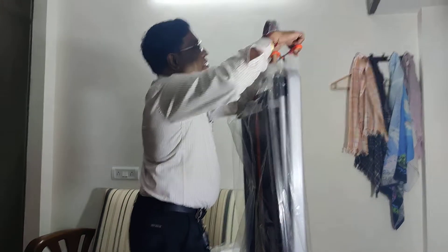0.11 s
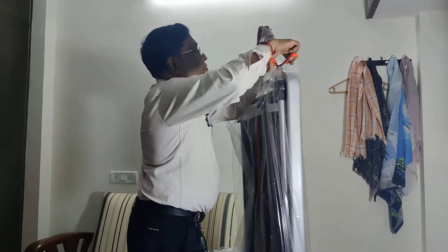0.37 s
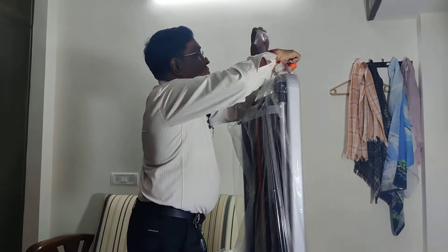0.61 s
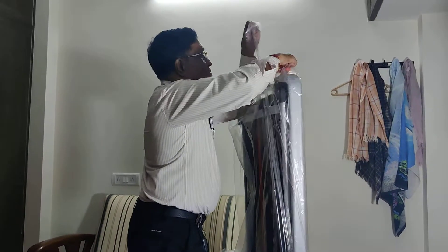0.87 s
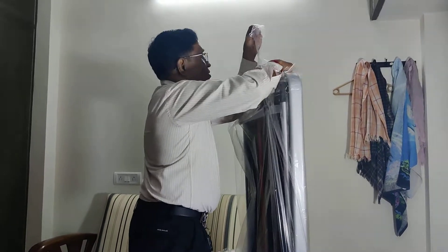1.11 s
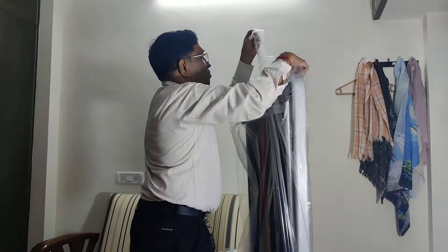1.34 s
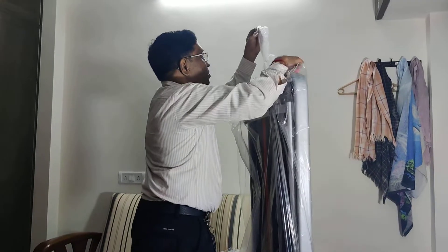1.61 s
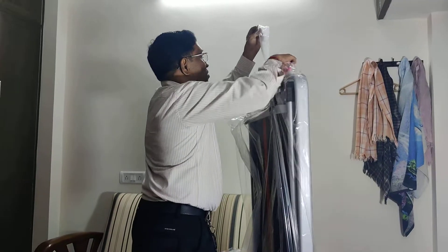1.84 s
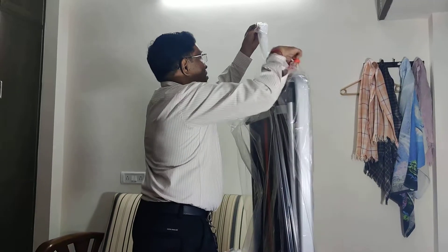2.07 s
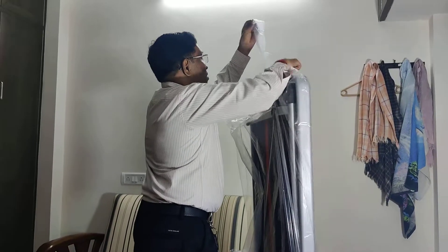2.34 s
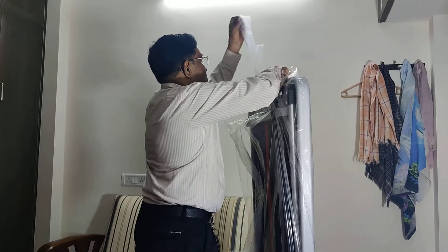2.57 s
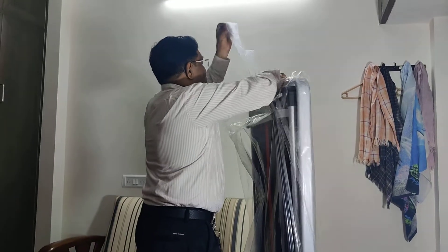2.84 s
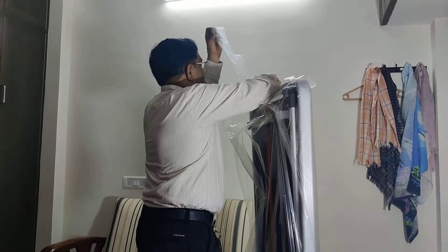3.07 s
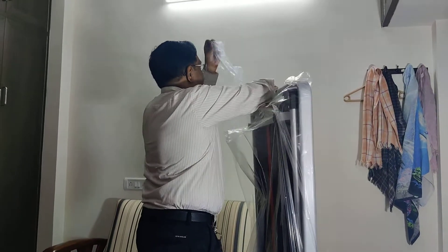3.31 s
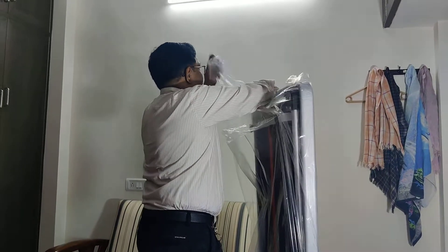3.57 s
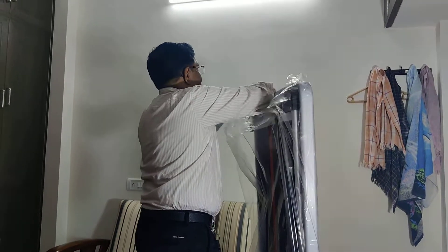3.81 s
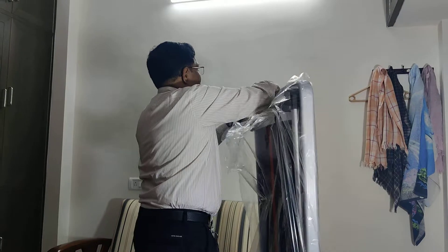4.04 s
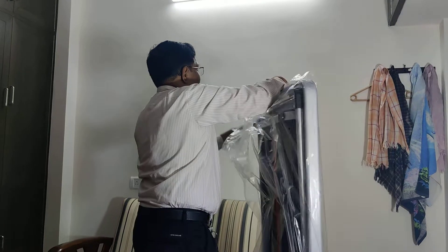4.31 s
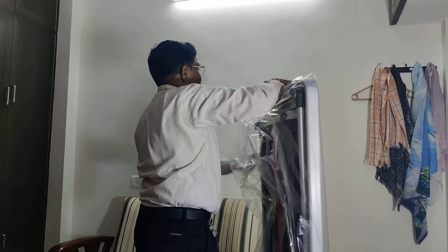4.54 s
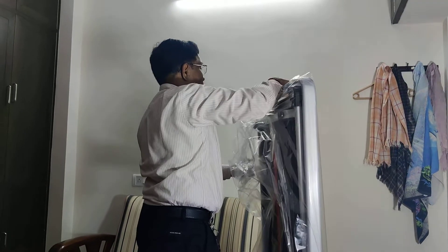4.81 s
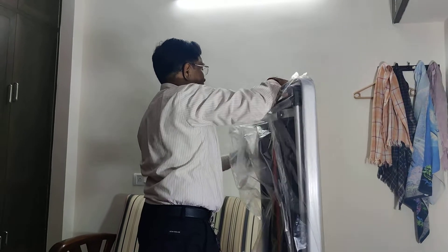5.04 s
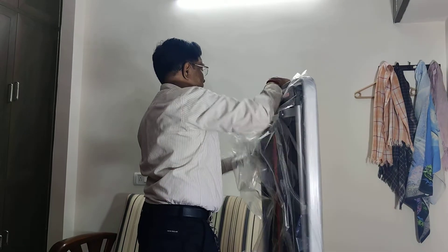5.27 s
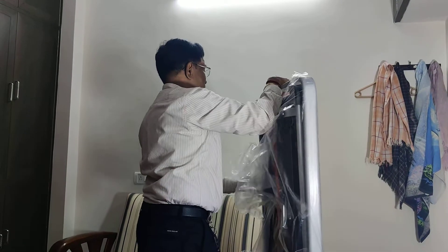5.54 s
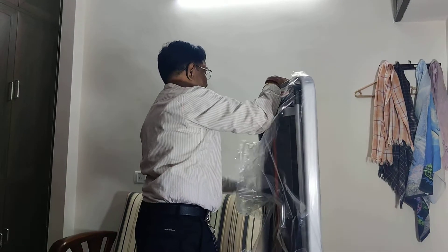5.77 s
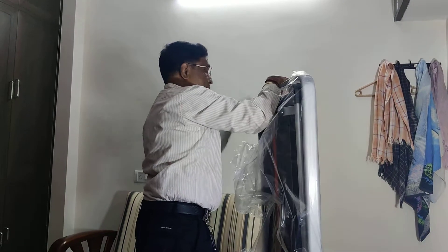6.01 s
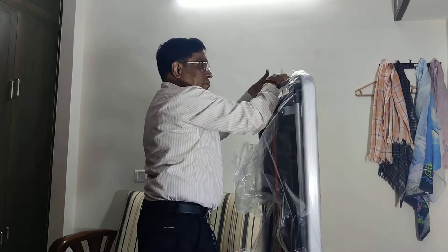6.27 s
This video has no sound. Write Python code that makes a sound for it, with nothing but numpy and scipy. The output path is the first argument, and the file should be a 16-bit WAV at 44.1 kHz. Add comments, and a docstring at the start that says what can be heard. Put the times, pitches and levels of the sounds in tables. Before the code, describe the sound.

Thick plastic film crackles and snaps in uneven tugs off a metal frame in a small room, with near-silent gaps between.

```python
"""In a small room, thick clear plastic film is tugged off a folded metal frame, a few metres from a phone.
Its creases buckle in dense crackle, made of thousands of coloured clicks, with louder snaps on top.
The sheet flaps in the lowest bands, and where it drags over the tubes, noise keeps frame modes ringing.
Close walls add a short tail; between tugs the room is almost silent, with a faint hiss and, last, a low hum."""
import sys
import numpy as np
from scipy import signal
from scipy.fft import rfft, irfft
from scipy.io import wavfile
from scipy.ndimage import uniform_filter1d

SR = 44100
rng = np.random.default_rng(int(sys.argv[2]) if len(sys.argv) > 2 else 0)


def volts(x):
    """Linear amplitude factor 10**(x/20) for a level x in dB, scalar or array-like."""
    e = np.asarray(x, float) / 20
    return 10 ** e


def store_pcm(level_fs):
    """Save levels as 16-bit WAV."""
    pcm = np.round(np.clip(level_fs, -1, 1) * 32767).astype(np.int16)
    wavfile.write(sys.argv[1], SR, np.atleast_2d(pcm).T)


N = 281799  # samples

# Pitches at which a tug sets flap, rustle, rub, crispness and top octave: pitch_hz
ANCHOR_HZ = [150, 800, 2500, 4600, 11000]
# Single creases that snap through: start_s, crack_peak_db, centre_hz, thump_db (over the crack)
SNAPS = [(0.5799, -19, 7580, 1), (0.5935, -11, 4177, 2), (0.6045, -11.5, 1648, -3.5),
         (0.675, -15, 6810, -17), (0.7475, -17.5, 1594, -4.5), (0.7967, -8, 3585, -32.5),
         (0.9683, -13, 1600, 6.5), (1.077, -5.5, 1595, -13), (1.1428, -12.5, 1540, -10),
         (1.248, -8, 5646, -22), (1.5237, -22.5, 5960, -24), (1.5855, -35.5, 3850, -19),
         (2.553, -10.5, 1520, 1), (2.581, 0, 3358, 1), (2.612, -2, 1655, 2), (2.7795, -3.5, 1557, -27.5),
         (3.0457, -2, 1666, -5), (3.101, -3, 1811, -2), (3.1574, -3, 4370, -6.5),
         (3.1822, -21.5, 4760, 6.5), (3.2189, -6, 4630, -2.5), (3.3906, -9, 1730, -6.5),
         (3.3994, -13.5, 1680, -32), (3.415, -4.5, 1620, -11), (3.4643, -14.5, 1690, 1),
         (3.7925, -21.5, 5600, -25), (3.8, -19.5, 2300, -22), (4.197, -34, 1550, 0),
         (4.362, -5.5, 2460, -14), (4.555, -13, 3090, -12.5), (4.8716, -29, 2943, -14),
         (4.8966, -20.5, 2805, -8)]
# Modes of the tube frame: pitch_hz, t60_s
FRAME_MODES = [(150, 0.057), (205, 0.14), (430, .07), (515, 0.012), (600, 0.063), (790, 0.11),
               (1080, 0.032), (1180, .06), (1340, 0.035), (1650, 0.054), (1720, .06), (1790, 0.06),
               (2020, 0.058), (2140, 0.23), (2640, 0.008), (2850, 0.086), (2990, .05), (3120, 0.059),
               (3260, 0.0061), (3410, 0.044), (3670, .09), (4240, 0.0718), (4450, 0.068), (5050, .06),
               (6500, .07), (6990, .05)]
# Usual colour of the crackling film: pitch_hz, level_db (per Hz)
FILM_COLOUR = [(25, -26), (60, -16), (124, -6), (287, -4.5), (414, -7.5), (614, -5), (800, -8), (1500, -6),
               (2530, -13.5), (4280, -9.5), (5300, -14.5), (6870, -11), (8300, -18), (16000, -22)]
# Colour of the hiss in the quiet room: pitch_hz, level_db (per Hz)
HISS_COLOUR = [(24, -46.5), (40, -13.5), (432, 3), (933, -10), (7130, -15.5), (8070, -15), (15000, -23.5)]
# Phone microphone response: pitch_hz, gain_db
MIC_RESPONSE = [(8200, -0.5), (9600, -10), (11000, -19), (15500, -14), (16300, -60.5)]
# Sudden yanks on the film: peak_s, rustle_db (at 800 Hz), fade_db_per_s,
# rub_db (2.5 kHz, over the rustle), crisp_db (above 4 kHz, over the rustle)
YANKS = [(0, -28.5, 500, -8, -8.5), (.526, -24.5, 150, -21, -12.5), (.566, -23, 100, -12, -6.5),
         (.6, -23.5, 150, -1.5, -0.5), (.964, -9, 150, -3, -8), (1.134, -27.5, 100, -0.5, -4.5),
         (1.34, -38, 150, -5, -7), (2.426, -29, 170, 15.5, -13.5), (2.554, -16, 100, 1, -10),
         (2.61, -9, 186.6, 1.5, -6.5), (2.774, -19.5, 129.3, 6, -6), (2.82, -23, 171, 7.5, -5.5),
         (3.046, -9, 132.2, -8, -8), (3.092, -13, 151, -4.5, -2.5), (3.156, -19.5, 200, -3, -7),
         (3.218, -21.5, 200, -0.5, -13), (3.324, -24, 85.8, 5.5, -7), (4.106, -33.5, 100, 3, -7),
         (4.332, -25, 60, 6.5, -3.5), (4.347, -22, 90, 4.5, -3), (4.65, -31, 119, 15.5, 4),
         (5.648, -50, 120, 6.5, 2)]
# Slower crumples that swell and fade: the same columns as the yanks
CRUMPLES = [(.12, -51, 70, -9, -27), (.27, -53, 121.7, -3, 0.5), (.32, -59.5, 200, -1.5, 1),
            (.42, -64.5, 50, -24, -18), (.72, -36.5, 100, 0, 2.5), (.82, -39, 65, 1.5, 2.5),
            (.91, -44.5, 150, 1, -1.5), (1.08, -28, 250, -2.5, -2), (1.24, -37, 80, 1, 2.5),
            (1.376, -30, 280, -6.5, -11), (1.5, -51, 60, -3.5, -2), (1.6, -61.5, 80, -5, 0.5),
            (1.7, -64.5, 100, -4, -6), (1.82, -67.5, 59.9, -8.5, -21), (1.94, -68, 120, 0.5, -8),
            (2.0, -70, 350, -3, -5), (2.09, -72, 600, -12, -25.5), (2.336, -65, 260, -1, 0.5),
            (2.93, -44.5, 70, 6, -3), (2.985, -35, 150, 4, -0.5), (3.02, -40.5, 252, 7, 6.5),
            (3.37, -18.5, 150, 8, -10), (3.45, -23.5, 190, 8.5, -4), (3.76, -48.5, 200, -0.5, 5.5),
            (3.805, -46.5, 300, 3, -4), (3.87, -57.5, 149, -3, 2.5), (3.95, -54.5, 70, -2, -20),
            (4.07, -51.5, 200, -3, -5.5), (4.162, -26.5, 240, 6.5, -4.5), (4.28, -47.5, 100, 9, 0),
            (4.4, -17, 223, 6.5, -3), (4.46, -22.5, 200, 11, -2.5), (4.54, -30.5, 150, 12, -2.5),
            (4.61, -31.5, 120, 14, 1.5), (4.694, -22, 160, 16.5, 1), (4.91, -41, 119.9, 11, 1.5),
            (4.965, -37, 250, 4.5, -4.5), (5.108, -47.5, 180, 1.5, -5.5), (5.22, -51.5, 90, -2.5, -17),
            (5.31, -63, 130, 10.5, -0.5), (5.47, -68.5, 80.1, 10, -10), (5.6, -62, 90, 1.5, -9.5),
            (5.7, -48, 170, 5, 4), (5.86, -59.5, 70, -8, -12.5), (5.94, -59, 150, 9, 2.5),
            (5.995, -55, 500, 10, 0.5)]
# Multiplier on the fade at each anchor pitch: share (no unit)
FADE_SHARE = [.85, 1.1, .95, .9, 1.077]
# The fade steepens as the film comes to rest, soonest in the treble: settle_db_per_s2 at each anchor
SETTLE_DB_S2 = [100, 200, 350, 500, 600]
# How much of the sheet hangs loose and flaps: time_s, level_db
SLACK = [(0, -3), (.6, -4), (1.0, -4), (1.6, -2.5), (2.4, -.5), (2.7, 2.5), (3.2, 1.5), (3.7, 2.5),
         (4.2, 2), (4.6, 0.9), (5.2, -0.1), (5.8, 3), (6.39, 3)]
# Modes that sound at each scraped place on the frame: mode_hz, level_db (added to the scrape's)
RAIL = [(205, -12.5), (600, -13), (790, -4.5), (1180, -6), (1790, 0.2), (2850, -9), (2990, -7.5), (3410, 1),
        (4450, -14.5), (6500, -4), (6990, -16.5)]
LEG = [(790, -0.4), (1080, -2.5), (1650, -1.5), (2850, -5.5), (3120, -16), (3410, -6.5)]
EDGE = [(1340, -8), (2020, -8.5), (2640, 1.2), (3260, -5)]
# Film scraping over the frame: start_s, length_s, level_db, place (one of the three above)
SCRAPES = [(1.337, .035, -36, LEG), (2.438, 0.047, -20.5, RAIL), (3.328, 0.068, -20.5, LEG),
           (4.669, 0.04, -29.5, LEG), (4.857, 0.1, -31.5, EDGE), (5.006, 0.146, -53, EDGE),
           (5.133, 0.2, -50.5, EDGE), (5.457, 0.18, -61.5, EDGE), (5.645, .07, -44, EDGE),
           (5.78, .23, -60.5, EDGE)]
# Short tones, mostly of the tubes, at one mode each; the last row is a faint low hum:
# start_s, length_s, mode_hz, level_db
TONES = [(.975, .025, 790, -18), (1.348, 0.014, 2020, -32), (1.336, 0.0076, 3410, -34.5),
         (1.357, 0.029, 600, -33.5), (2.33, 0.024, 3670, -52.5), (2.424, 0.067, 2140, -17.5),
         (2.428, .044, 5050, -31.5), (2.613, 0.055, 430, -19.5), (2.806, 0.012, 6500, -29),
         (2.816, 0.045, 2140, -27), (2.831, .027, 790, -23), (2.956, 0.037, 790, -24.5),
         (3.06, 0.17, 150, -25), (3.37, 0.11, 1650, -24.5), (3.48, 0.0455, 790, -31),
         (3.894, .12, 1720, -58.5), (3.9, .11, 1180, -60.5), (4.119, 0.061, 515, -32),
         (4.429, 0.084, 1650, -26), (4.504, .078, 3120, -20.5), (4.604, 0.086, 3120, -19),
         (4.583, 0.023, 4240, -30), (4.589, 0.15, 600, -30), (4.658, .034, 1720, -17),
         (4.719, 0.0506, 2990, -22.5), (4.716, .033, 1790, -24), (3.32, 0.03, 6500, -28.5),
         (4.675, .02, 6500, -25), (2.331, .027, 3120, -64), (3.3, .03, 790, -64.5),
         (2.057, 0.0404, 790, -78), (2.95, .07, 3670, -38), (1.9, 0.098, 1340, -71),
         (2.4, 0.051, 2020, -71.5), (4.8, .05, 600, -62.5), (5.96, 0.036, 1650, -57.5),
         (6.28, .11, 205, -72)]
# Edges of the third-octave bands of the crackle: pitch_hz
BAND_EDGES_HZ = 3800 * 2 ** np.arange(-19 / 3, 2.4, 1 / 3)

CREASES_PER_S, SIZE_SPREAD_DB, COLOUR_SPREAD_DB = 4000, 3.5, 6
LARGEST_SHARE = 0.997  # below 1, so that the largest crease stays finite
YANK_RISE_DB_S, SWELL_OVER_FADE = 5001, 1.6
FLAP_DB, FLAP_LAG_S = -6, 0.015  # the whole sheet moves a little after the creases
FLAP_LOST_PER_RUB = 0.5  # taut film rubs more and flaps less (dB per dB)
AIR_LOST_PER_RUB = 0.34  # rubbing has less top octave than buckling (dB per dB)
TWIN_SPLIT, DAMPED_T60_S = 0.0067, 0.11  # split as a share of the mode pitch
FRAME_SHAKE_DB = -15  # shaken tubes relative to the film
ROOM_T60_S, ROOM_DB = 0.28, -9  # tail relative to the direct sound
HISS_DB = -80  # rms ahead of the microphone


def unit(x):
    """Scale to rms 1."""
    return x / np.sqrt(np.mean(x ** 2))


def band(x, lo_hz, hi_hz):
    """Causal band-pass."""
    sos = signal.butter(2, [lo_hz, min(hi_hz, SR / 2.1)], "bandpass", fs=SR, output="sos")
    return signal.sosfilt(sos, x)


def colour(x, points):
    """Causal filter with the given (Hz, dB) shape, from the folded cepstrum."""
    size = 4096
    hz, db = np.transpose(points)
    bin_hz = np.arange(size // 2 + 1) * SR / size
    log_gain = np.interp(np.log(bin_hz + 1), np.log(hz), db) * np.log(10) / 20
    cepstrum = irfft(log_gain)
    cepstrum[1:size // 2] *= 2
    cepstrum[size // 2 + 1:] = 0
    impulse = irfft(np.exp(rfft(cepstrum)))
    return signal.fftconvolve(x, impulse)[:N]


def walk(rate):
    """Random levels held 1 / rate s and slewed twice; spread 1."""
    hold = int(SR / rate)
    steps = np.repeat(rng.standard_normal(N // hold + 1), hold)
    slewed = uniform_filter1d(uniform_filter1d(steps, hold), hold)
    return unit(slewed[:N])


def crackle():
    """Tiny creases buckle in clusters, few large and many small, each with its own colour; tugs set the level."""
    # tug levels at which the film has its usual colour
    usual_db = np.array([-29.5, -27.5, -23.5, -27.0, -27.0])
    tug_db = pull() - usual_db[:, None]
    most = 40000  # draws to choose from
    count = int(CREASES_PER_S * N / SR)
    when, sign, rarity = rng.random((most, 3))[:count].T
    tint = rng.standard_normal((most, len(BAND_EDGES_HZ)))[:count]
    at = (when * N).astype(int)
    size_db = -SIZE_SPREAD_DB * np.log(1 - LARGEST_SHARE * rarity)
    size_db = size_db + 2.3 * walk(38)[at]  # clusters
    size = np.sign(sign - 0.5) * volts(size_db)
    size /= np.sqrt(np.sum(size ** 2) / N)
    out = 0
    for k, (lo, hi) in enumerate(zip(BAND_EDGES_HZ, BAND_EDGES_HZ[1:])):
        clicks = np.bincount(at, size * volts(COLOUR_SPREAD_DB * tint[:, k]), N)
        # blend the tug levels of the two nearest anchors
        place = np.interp(np.log(lo * hi) / 2, np.log(ANCHOR_HZ), np.arange(len(ANCHOR_HZ)))
        near = min(int(place), len(ANCHOR_HZ) - 2)
        db = tug_db[near] + (place - near) * (tug_db[near + 1] - tug_db[near])
        out = out + band(clicks * volts(db + 1.4 * walk(12) + 2.5), lo, hi)
    return volts(-12) * colour(out, FILM_COLOUR)


def pull():
    """Level in dB at the five anchors: every yank and crumple rises, peaks and fades, and their powers add."""
    t = np.arange(0, N / SR, 0.001)
    power = 1e-12
    lag = np.array([FLAP_LAG_S, 0, 0, 0, 0])[:, None]
    share = np.array(FADE_SHARE)[:, None]
    settle = np.array(SETTLE_DB_S2)[:, None]
    for rows, sudden in ((YANKS, True), (CRUMPLES, False)):
        for s, db, fade, rub_db, crisp_db in rows:
            since = t - s - lag
            rise = YANK_RISE_DB_S if sudden else SWELL_OVER_FADE * fade
            slope = np.where(since < 0, rise, -fade * share - since * settle)
            flap_db = FLAP_DB + np.interp(s, *np.transpose(SLACK)) - FLAP_LOST_PER_RUB * rub_db
            air_db = crisp_db - AIR_LOST_PER_RUB * rub_db
            peak_db = db + np.array([flap_db, 0, rub_db, crisp_db, air_db])[:, None]
            power = power + volts(peak_db + slope * since) ** 2
    return np.array([np.interp(np.arange(N) / SR, t, 10 * np.log10(row)) for row in power])


def snaps():
    """A snap is a short crack round its own pitch and a low thump; neighbouring creases give way just after it."""
    out, t = np.zeros(N), np.arange(3000) / SR
    for s, db, hz, thump_db in SNAPS:
        noise = rng.standard_normal(len(t))
        neighbours = 0.019 * noise ** 3 * np.exp(-t / 0.0027)  # cubing leaves sparse spikes
        burst = noise * np.exp(-t / 0.0004) + neighbours
        crack = band(burst, hz / 1.6, hz * 1.4) + 0.3 * band(burst, 500, 7200)
        thump = np.sin(2 * np.pi * 750 * t) * np.exp(-t / 0.0032)
        one = volts(db) * (crack / np.abs(crack).max() + volts(thump_db) * thump)
        i = int(s * SR)
        out[i:i + len(t)] += one[:N - i]
    return out


def scrapes_and_tones():
    """Jerky noise, as of friction, keeps a mode ringing for its length; then it is damped fast, as by a
    gripping hand."""
    out, modes = np.zeros(N), np.array(FRAME_MODES)
    rows = list(TONES)
    for s, length, db, place in SCRAPES:
        rows += [(s, length, hz, db + mode_db) for hz, mode_db in place]
    for s, length, hz, db in rows:
        t = np.arange(int((length + 2 * DAMPED_T60_S) * SR)) / SR
        noise = rng.standard_normal(SR // 2)[:len(t)]
        jerky = noise * np.abs(noise)  # squared with the sign kept
        nearest = np.argmin(np.abs(modes[:, 0] - hz))
        one = ring(jerky, *modes[nearest])
        onset = np.clip(t / (0.18 * length), 0, 1)
        damping = volts(-60 * np.maximum(t - length, 0) / DAMPED_T60_S)
        level = volts(db) / np.std(one[:int(length * SR)])
        i = int(s * SR)
        out[i:i + len(t)] += (level * onset * damping * one)[:N - i]
    return out


def shaken_frame(film):
    """The crackle passes into the tubes the film lies on, and every mode rings a little."""
    out = 0
    for hz, t60 in FRAME_MODES:
        out = out + ring(film, hz, t60) * (1 - volts(-60 / (t60 * SR)))  # evens out long and short modes
    return volts(FRAME_SHAKE_DB) * out * np.std(film) / np.std(out)


def ring(x, hz, t60):
    """A mode and its slightly detuned twin, each a decaying resonator, skirts trimmed."""
    turn = 2j * np.pi * hz * np.array([1, 1 + TWIN_SPLIT]) / SR
    poles = np.exp(turn - np.log(1000) / (t60 * SR))
    mode = signal.lfilter([1], [1, -poles[0]], x).imag
    twin = signal.lfilter([1], [1, -poles[1]], x).imag
    return band(mode + 1.48 * twin, hz / 1.378, hz * 1.008)


def room(x):
    """Close walls add a short diffuse tail, duller than the direct sound."""
    t = np.arange(SR // 2) / SR
    tail = rng.standard_normal(len(t)) * volts(-60 * t / ROOM_T60_S)
    tail = band(tail * np.clip(t / 0.00053, 0, 1), 140, 8500)
    tail /= np.sqrt(np.sum(tail ** 2))
    return x + volts(ROOM_DB) * signal.fftconvolve(x, tail)[:N]


def hiss():
    """Faint steady noise under everything, coloured to the quiet room."""
    return volts(HISS_DB) * unit(colour(rng.standard_normal(N), HISS_COLOUR))


def scene():
    """Film, frame and short tones in the room over a faint hiss."""
    floor = hiss()
    film = crackle() + snaps()
    source = film + shaken_frame(film) + scrapes_and_tones()
    return (room(source) + floor)[None]


def band_limit(x):
    """A steep low-pass at the top of the band."""
    return signal.sosfilt(signal.butter(12, 16070, fs=SR, output="sos"), x)


def record(dry):
    """The phone microphone loses the top octave and rounds off the loudest peaks."""
    ceiling = 0.9  # of full scale
    heard = colour(dry[0], MIC_RESPONSE)[None]
    mix = ceiling * np.tanh(heard / ceiling)
    return band_limit(mix)


dry = scene()
out = record(dry)
store_pcm(out)
```